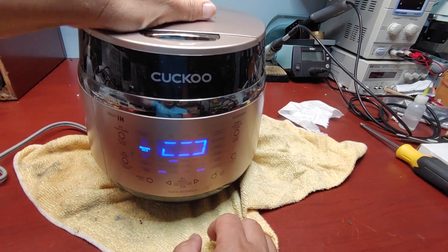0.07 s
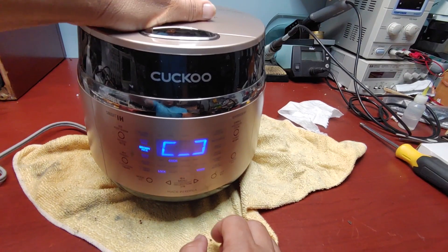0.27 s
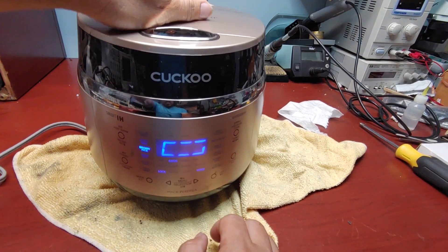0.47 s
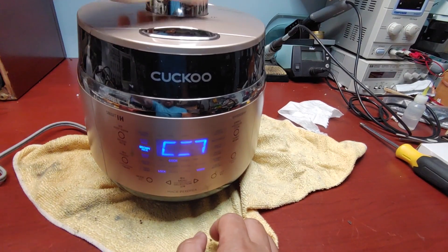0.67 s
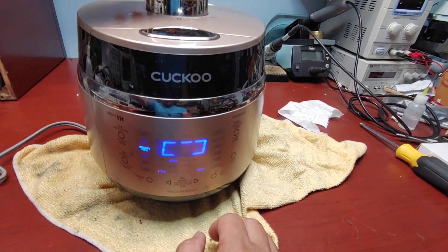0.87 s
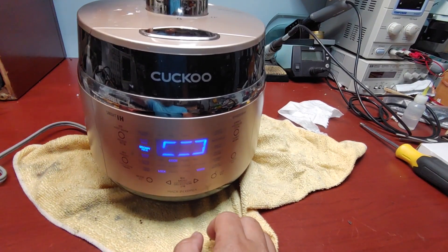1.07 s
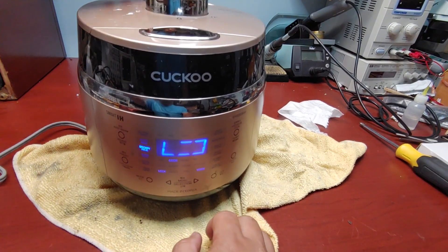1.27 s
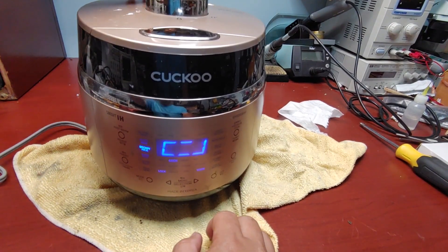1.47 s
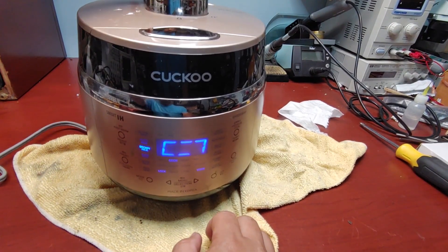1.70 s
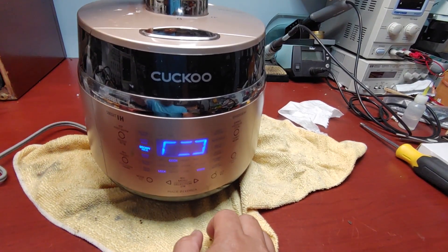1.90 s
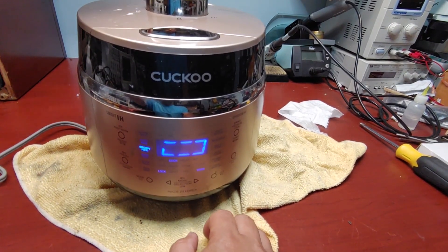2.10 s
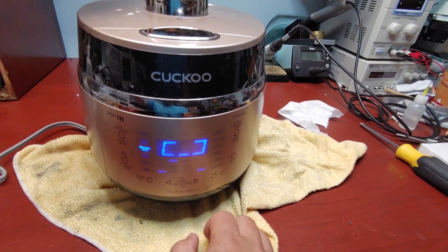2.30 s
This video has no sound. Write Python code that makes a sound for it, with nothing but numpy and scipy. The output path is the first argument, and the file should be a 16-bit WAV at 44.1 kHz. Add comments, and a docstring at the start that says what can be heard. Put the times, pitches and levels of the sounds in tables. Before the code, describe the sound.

A sharp latch click rings through a pressure cooker's lid, close by. After a few soft taps, a vent hisses briefly with a thin sinking whistle, and its valve clacks back down twice over a faint workshop fan.

```python
"""A quiet workshop, with a pressure rice cooker on the bench and a fan droning behind it.
A hand works the lid latch: it slides, snaps home and sets the lid and spring ringing, with a few
light taps around it. Later the valve clicks open and a short jet hisses through the vent, its
whistle falling as the pressure drops. The valve clatters back onto its seat twice."""
import sys
import numpy as np
from scipy import signal
from scipy.fft import rfft, irfft
from scipy.io import wavfile

SR = 44100
rng = np.random.default_rng(int(sys.argv[2]) if len(sys.argv) > 2 else 0)


def dump_mix(stems):
    """Bounce the given channels to the path in sys.argv[1] as a 16-bit WAV at rate SR."""
    frames = np.atleast_2d(stems).T  # one column per channel
    limited = np.clip(frames, -1, 1)  # hard clip at full scale
    pcm = np.round(limited * 32767).astype(np.int16)
    wavfile.write(sys.argv[1], SR, pcm)


N = 108045
TIME = np.arange(N) / SR
HZ = np.maximum(np.fft.rfftfreq(N, 1 / SR), 1)
RIGHT_LAG_S = 0.00016  # the right side hears the cooker a little late


# The catch snapping home: start_s, crack_db, ring_db
LATCH_SNAPS = [(.2188, -20.5, -22), (0.2224, -9.5, -7), (0.2365, -17.5, -27.5)]
# EQ of the crack: freq_hz, level_db
CRACK_EQ = [(50, -21), (250, -0.5), (600, -3.5), (1000, 6.5), (1800, 0), (2900, -5.5), (4300, -3.5),
            (5200, -12), (6600, -7.5), (8200, -15.5), (9900, -6.5), (12500, -17), (15500, -16.5)]
# Bite of the catch at first contact: freq_hz, width_hz, boost_db
CATCH_RESONANCES = [(4070, 750, 14), (6700, 490, 0.5)]
# Ring of the lid: pitch_hz, level_db, t60_s
LID_RING = [(168.7, -21.5, 0.18), (289.6, -16.5, 0.15), (440, -14.5, 0.15), (485, -20, 0.1),
            (635, -11.5, 0.13), (827, -14.5, 0.14), (872.5, -3.5, 0.14), (954, -7, .11), (1070, -14, 0.062),
            (1142, 2, .075), (1260, -20, 0.085), (1832, -9, 0.096), (1674, -7, .08)]
# Long, thin ring of the spring: pitch_hz, level_db, t60_s
SPRING_RING = [(1900, -31, .46), (2525, -41, .35), (5850, -37, .42), (7540, -40, .55)]
# Soft rubbing and sliding, then a brief swell of noise into the snap: time_s, level_db
LEAD_IN_FADER = [(0, -42), (.018, -41), (.04, -57.5), (.15, -56), (.175, -47.5), (.203, -37), (.216, -30.5),
                 (.23, -61), (.34, -52), (.46, -62), (.53, -54), (.58, -74), (.7, -94)]
# EQ of that lead-in: freq_hz, level_db
LEAD_IN_EQ = [(100, -8.5), (500, -1), (1200, 2), (1900, -4), (2800, -12), (4000, -10), (6000, -21.5),
              (10000, -17.5), (15000, -29)]

def latch():
    """The catch slides, then snaps home against the lid; its spring sings on."""
    cracks = [(s, db) for s, db, _ in LATCH_SNAPS]
    blows = [(s, db) for s, _, db in LATCH_SNAPS]
    hardest_s, _ = max(blows, key=lambda blow: blow[1])
    lead_in_db, = automation(LEAD_IN_FADER)
    crack = rattle(cracks, CRACK_EQ, t60_s=0.15, tail_db=-28, tail_t60_s=0.24)
    lid = ring(blows, LID_RING, attack_s=0.00045, scatter_db=2.5, alternate_polarity=True)
    spring = ring([(hardest_s, -10)], SPRING_RING, attack_s=0.002, scatter_db=2.5)
    contact = noise(CRACK_EQ, CASING_PAN, CATCH_RESONANCES) * decays(cracks, t60_s=0.022)
    lead_in = from_db(lead_in_db) * noise(LEAD_IN_EQ, CASING_PAN)
    return contact + crack + lid + spring + lead_in


# Strength of the jet: time_s, level_db
FLOW_FADER = [(1.65, -95), (1.694, -38), (1.704, -31), (1.76, -23.5), (1.80, -22.5), (1.86, -24.5),
              (1.93, -27), (2.0, -32.5), (2.06, -30), (2.13, -43.5), (2.19, -39), (2.24, -79), (2.3, -95)]
# EQ of the hiss: freq_hz, level_db
HISS_EQ = [(100, -25), (240, -30), (320, -5), (420, -12.5), (650, -26.5), (1100, -10), (1400, -5),
           (1700, 0), (2600, -0.5), (4200, -4.5), (5000, -4), (5400, -9), (6800, -10), (8300, -22.5),
           (10000, -9.5), (11000, -22.5), (12000, -14.5), (15500, -19)]
# Resonances of the vent: freq_hz, width_hz, boost_db
VENT_RESONANCES = [(1357, 40, 13.5), (1856, 78, 8), (1975, 30, 11), (2060, 30, 1), (2062, 29, 5),
                   (2580, 8.4, -3), (3223, 150, 9), (3600, 23, 10.5), (3676, 12, 12.5), (4636, 20, 4.5),
                   (4790, 20, 12.5), (4660, 350, 4), (9910, 310, 8), (12020, 54, 6), (12600, 50, -3),
                   (13440, 40, 4)]
# Stereo spread of the jet: freq_hz, left_minus_right_db
JET_PAN = [(300, -2), (1100, -4.5), (2000, 6.5), (3200, -3.5), (4800, 0.5), (8000, -1), (10200, -5.5),
           (11800, 7.5), (15500, 6)]
# Two pulses of hum in the lid's cavity: time_s, level_db
HUM_FADER = [(1.715, -79), (1.728, -30.5), (1.748, -42), (1.768, -66), (1.80, -36), (1.83, -40.5),
             (1.86, -78), (1.95, -75)]
HUM_HZ, PIPE_HZ, TREBLE_HZ = 322, 4740, 8000
TREBLE_SWELL, PIPE_SWELL = 0.4, 0.35  # extra dB per dB of flow

def jet():
    """The jet hisses, brighter as it swells; it makes the vent pipe sing and the lid's cavity hum."""
    flow_db, = automation(FLOW_FADER)
    hum_db, = automation(HUM_FADER)
    flow = from_db(flow_db)
    below_full_db = flow_db - flow_db.max()
    air = noise(HISS_EQ, JET_PAN, VENT_RESONANCES)
    treble = irfft(rfft(air) * (HZ > TREBLE_HZ), N)
    hiss = flow * (air - treble + treble * from_db(TREBLE_SWELL * below_full_db))
    pipe_gain = flow * from_db(-5.5 + PIPE_SWELL * below_full_db)
    pipe = pipe_gain * air_tone(np.full(N, PIPE_HZ), half_width_hz=110)
    hum = from_db(hum_db) * np.sqrt(2) * np.sin(2 * np.pi * HUM_HZ * TIME)
    return reflections(hiss + whistle()) + pipe + hum


# The whistle's dive, ahead of its EQ: time_s, pitch_hz, tone_db, breath_db
WHISTLE_GLIDE = [(1.69, 16200, -78, -69.5), (1.76, 15700, -50, -40), (1.81, 15400, -39, -22),
                 (1.855, 14670, -23, -24.5), (1.895, 13640, -42, -24.5), (1.925, 12740, -16.5, -25),
                 (1.96, 12220, -25, -25), (1.982, 10300, -22, -50), (2.008, 10080, -17, -37),
                 (2.03, 9600, -54, -28.5), (2.10, 7000, -45, -43), (2.122, 6680, -38, -61),
                 (2.14, 6590, -36, -53.5), (2.158, 6380, -52, -65), (2.22, 6200, -95, -96)]
# How readily the vent sounds the whistle: freq_hz, gain_db
WHISTLE_EQ = [(6000, -1), (6900, 1.5), (8200, -12), (9500, -9), (10100, -4.5), (10500, -7), (10900, -28),
              (11350, -16), (11900, 4.5), (12600, -9.5), (13200, -5), (14000, 3), (14600, -22),
              (15300, 0.5), (15900, -6.5)]

def whistle():
    """A rough, breathy whistle that sinks as the pressure falls."""
    pitch_hz, tone_db, breath_db = automation(WHISTLE_GLIDE)
    fundamental = air_tone(pitch_hz, half_width_hz=170)
    octave = from_db(0.5) * air_tone(2 * pitch_hz, half_width_hz=600)
    breath = air_tone(pitch_hz, half_width_hz=1640)
    blend = from_db(tone_db) * (fundamental + octave) + from_db(breath_db) * breath
    return irfft(rfft(blend) * from_db(at_hz(WHISTLE_EQ)), N)


# The valve hitting its seat: start_s, clack_db, body_db
VALVE_HITS = [(2.031, -27, -38), (2.0375, -15, -36), (2.0462, -20.5, -32), (2.0583, -17.5, -7.5),
              (2.135, -63, -22.5), (2.1554, -20, -16), (2.1779, -22.5, -29), (2.1873, -29.5, -20)]
# EQ of a clack: freq_hz, level_db
CLACK_EQ = [(60, -32), (200, -5.5), (450, 7), (720, -5.5), (1000, 3.5), (1600, -3), (2400, -3.5),
            (3600, -11.5), (4500, -9.5), (5500, -13.5), (8000, -16.5), (10000, -8), (11500, -22),
            (15500, -27)]
# Ring of the cooker's body, shared with knocks_and_click: pitch_hz, level_db, t60_s
BODY_RING = [(168.6, -22.5, 0.15), (276.6, -2.5, 0.1), (409.2, -1, 0.084), (429.7, -13, 0.09),
             (486, -17.5, 0.082), (570, -18, 0.12), (935, -11.5, 0.1), (1237, -10.5, .055)]

def valve():
    """The valve drops onto its seat in two bursts of clacks that thump the body."""
    hits = [(s, db) for s, db, _ in VALVE_HITS]
    thumps = [(s, db) for s, _, db in VALVE_HITS]
    clacks = rattle(hits, CLACK_EQ, t60_s=0.1, tail_db=-14, tail_t60_s=0.22)
    return clacks + ring(thumps, BODY_RING, attack_s=0.0014, scatter_db=2.5)


# Light knocks on the lid, and the bright click of the valve opening:
# start_s, knock_db, body_db, lowpass_hz
KNOCKS_AND_CLICK = [(0.1222, -29.5, -45.5, 1900), (0.6517, -30.5, -35, 1930), (0.8286, -26.5, -30, 2300),
                    (1.6637, -29, -27.5, 12000), (1.7238, -30, -27.5, 2500)]
# EQ of each hit: freq_hz, level_db
KNOCK_EQ = [(50, -38.5), (100, -22), (170, -6), (380, 2.5), (750, -4), (1250, -4.5), (1550, -4.5),
            (1900, -3), (2500, -15), (4500, -14), (8000, -17.5), (10000, -9), (12500, -33)]
# Hollow resonances of the lid: freq_hz, width_hz, boost_db
LID_HOLLOW = [(369.6, 52, 2.5), (1289, 150, 7.5), (1850, 300, 6.5)]

def knocks_and_click():
    """Light knocks on the lid and the bright click of the valve opening each ring the body."""
    thumps = [(s, db) for s, _, db, _ in KNOCKS_AND_CLICK]
    out = ring(thumps, BODY_RING, attack_s=0.0028, scatter_db=2)
    for s, db, _, lowpass_hz in KNOCKS_AND_CLICK:
        hit = rattle([(s, db)], KNOCK_EQ, t60_s=0.092, tail_db=-27, tail_t60_s=0.15, peaks=LID_HOLLOW)
        out += lowpass(hit, lowpass_hz)
    return out


# Ticks of the casing: start_s, level_db
CASING_TICKS = [(.0718, -40), (.1075, -56), (.638, -54), (.942, -53.5), (1.442, -52.5), (1.475, -52),
                (1.505, -57), (2.42, -56)]
# Their thin, bright EQ: freq_hz, level_db
TICK_EQ = [(500, -9), (3000, -5), (5500, 3), (8000, -5), (9700, 3), (12000, -7), (15500, -2)]

def casing_ticks():
    """The casing gives tiny dry ticks."""
    return rattle(CASING_TICKS, TICK_EQ, t60_s=0.034, tail_db=-15.5, tail_t60_s=0.19)


# Bumps of the pot: start_s, level_db
POT_BUMPS = [(.074, -38), (.0855, -31), (.135, -35), (.228, -39), (.28, -36), (.32, -42), (.39, -42),
             (2.06, -52), (2.085, -34), (2.156, -32), (2.18, -41)]
# Their muffled, bassy EQ: freq_hz, level_db
BUMP_EQ = [(25, -16.5), (60, -5.5), (155, 3), (300, -12.5), (600, -8), (1500, -19.5), (4000, -50)]
BUMP_ATTACK_S = 0.0044

def pot_rocking():
    """The pot rocks on its cloth in low, cushioned bumps."""
    pole = np.exp(-1 / (BUMP_ATTACK_S * SR))
    envelope = signal.lfilter([1 - pole], [1, -pole], decays(POT_BUMPS, t60_s=0.099))
    return envelope * noise(BUMP_EQ, CASING_PAN)


# EQ of the room tone: freq_hz, level_db
ROOM_EQ = [(25, -6.5), (50, -13), (82, -16.5), (114, -15.5), (170, -10), (240, -15), (280, -6),
           (350, -12.5), (420, -7), (480, -16.5), (700, -15), (1040, -15.5), (1650, -25), (2000, -23),
           (3900, -35.5), (8000, -47), (10000, -38.5), (11500, -43), (14500, -47), (15800, -54)]
# Drone of the bench fan: freq_hz, width_hz, boost_db
FAN_DRONE = [(282, 22, 3), (375.4, 3.7, 11.5), (432, 5.2, 6.5)]

def workshop():
    """A quiet bed of room air with a fan's drone."""
    slightly_left = [(60, 1.73), (300, 0), (15000, 0.8)]  # freq_hz, left_minus_right_db
    return from_db(-47.5) * noise(ROOM_EQ, slightly_left, FAN_DRONE)


# Stereo spread of all the casing's noises: freq_hz, left_minus_right_db
CASING_PAN = [(100, 1), (1000, 0), (3500, 2), (9000, -3.5), (13000, 5)]

def rattle(hits, eq, t60_s, tail_db, tail_t60_s, peaks=()):
    """The crowd of short, close modes that a blow wakes, and its tail in the room."""
    tail = from_db(tail_db) * decays(hits, tail_t60_s)
    return noise(eq, CASING_PAN, peaks) * np.hypot(decays(hits, t60_s), tail)


def ring(hits, modes, attack_s, scatter_db, alternate_polarity=False):
    """Blows (start_s, level_db) ring the modes, each time in a slightly different balance."""
    out = np.zeros((2, N))
    for s, db in hits:
        start = int(s * SR)
        for k, (hz, mode_db, t60_s) in enumerate(modes):
            t = TIME[:min(N - start, int(2 * t60_s * SR))]
            gain = from_db(db + mode_db + scatter_db * rng.standard_normal())
            envelope = (1 - np.exp(-t / attack_s)) * from_db(-60 * t / t60_s)
            polarity = -1 if alternate_polarity and k % 2 else 1
            left_lead = np.pi * hz * RIGHT_LAG_S * np.array([[1], [-1]])
            tone = np.sin(2 * np.pi * hz * t + left_lead)
            out[:, start:start + len(t)] += polarity * gain * envelope * tone
    return out


def air_tone(pitch_hz, half_width_hz):
    """Turbulence in one resonance: a band of noise that follows the pitch."""
    a, b = lowpass(rng.standard_normal((2, 2, N)), half_width_hz)
    phase = 2 * np.pi * np.cumsum(pitch_hz) / SR
    band = unit_rms(a * np.cos(phase) + b * np.sin(phase))
    return band * pan(at_hz(JET_PAN, pitch_hz)) * (pitch_hz < SR / 2)


def reflections(x, wet_db=0.5, t60_s=0.11):
    """Add dense early reflections from bench and walls, different on each side, at unchanged power."""
    t = TIME[:SR // 8]
    response = rng.standard_normal((2, len(t))) * from_db(-60 * t / t60_s)
    response *= from_db(wet_db) / np.linalg.norm(response, axis=1, keepdims=True)
    response[:, 0] = 1  # direct sound
    return signal.fftconvolve(x, response, axes=1)[:, :N] / np.hypot(1, from_db(wet_db))


# Stereo image, narrow in the lows and wide on top: freq_hz, correlation
STEREO_CORRELATION = [(60, 0.7), (200, 0.98), (420, 0.98), (700, 0.73), (1050, 1), (2000, 0.17),
                      (4500, 0.14), (9000, .25), (15000, 0.15)]

def noise(eq, pan_curve, peaks=()):
    """Steady stereo noise with EQ and resonances, reaching the left side first; rms 1."""
    alike = np.clip(at_hz(STEREO_CORRELATION), -0.99, 0.99)
    mid, side = rfft(rng.standard_normal((2, N)))
    spectrum = np.sqrt(1 + alike) * mid + np.sqrt(1 - alike) * side * [[1], [-1]]
    delay = np.exp(-2j * np.pi * HZ * RIGHT_LAG_S * np.arange(2)[:, None])
    boost = sum(from_db(db) ** 2 / (1 + (2 * (HZ - hz) / width) ** 2) for hz, width, db in peaks)
    gain = from_db(at_hz(eq)) * np.sqrt(1 + boost)
    return unit_rms(irfft(gain * spectrum * delay * pan(at_hz(pan_curve)), N))


def decays(hits, t60_s):
    """Envelope of blows (start_s, level_db) that die away and add in power."""
    power = np.zeros(N)
    for s, db in hits:
        fall_db = 60 * np.clip((TIME - s) / t60_s, 0, 3)
        power += (TIME >= s) * from_db(db - fall_db) ** 2
    return np.sqrt(power)


def automation(rows):
    """Each column of a timed curve at every sample."""
    time_s, *columns = np.transpose(rows)
    return [np.interp(TIME, time_s, column) for column in columns]


def at_hz(points, hz=HZ):
    """Read a curve on a log-frequency axis."""
    freq_hz, values = np.transpose(points)
    return np.interp(np.log(hz), np.log(freq_hz), values)


def pan(db):
    """Constant-power left and right gains, db apart."""
    gains = from_db(np.array([db, -db]) / 2)
    return gains / np.sqrt(np.mean(gains ** 2, axis=0))


def lowpass(x, hz):
    """Roll off the top at 12 dB per octave."""
    return signal.sosfilt(signal.butter(2, hz, fs=SR, output="sos"), x)


def from_db(db):
    """Decibels to gain."""
    return 10 ** (np.asarray(db) / 20)


def unit_rms(x):
    """Scale to unit power."""
    return x / np.sqrt(np.mean(np.abs(x) ** 2) + 1e-20)


def scene():
    """The cooker in its room."""
    return latch() + jet() + valve() + knocks_and_click() + casing_ticks() + pot_rocking() + workshop()


def record(dry):
    """The microphone sheds the rumble, the loudest peaks clip and the top is cut."""
    low_cut = signal.butter(2, 45, "high", fs=SR, output="sos")
    high_cut = signal.ellip(14, 0.1, 80, 15750, fs=SR, output="sos")
    clipped = np.clip(signal.sosfilt(low_cut, dry), -0.9, 0.9)
    return signal.sosfilt(high_cut, clipped)


dry = scene()
out = record(dry)
dump_mix(out)
```